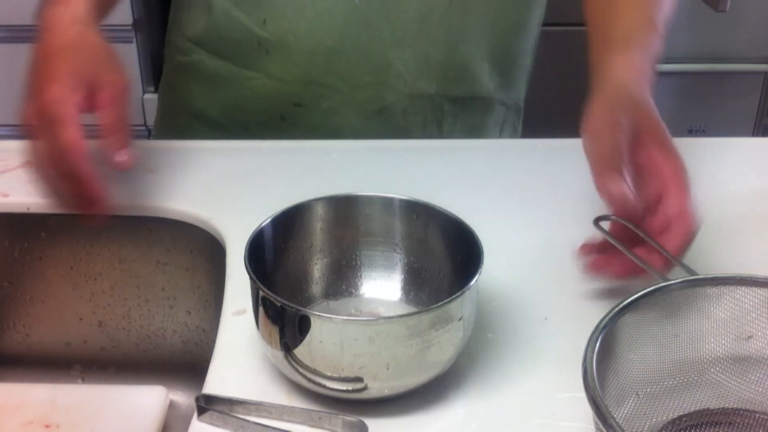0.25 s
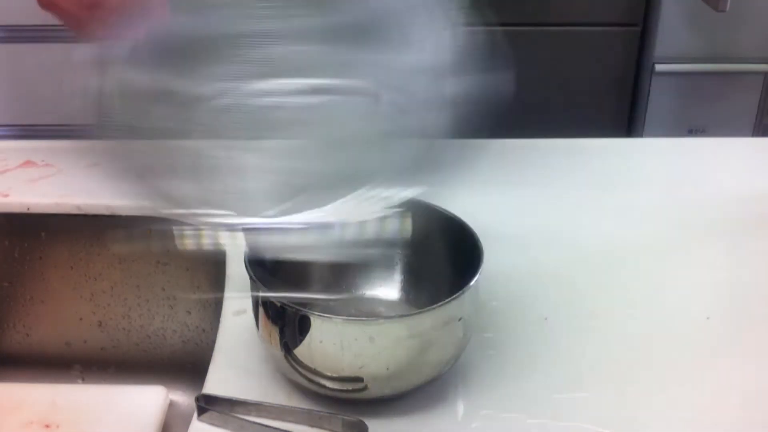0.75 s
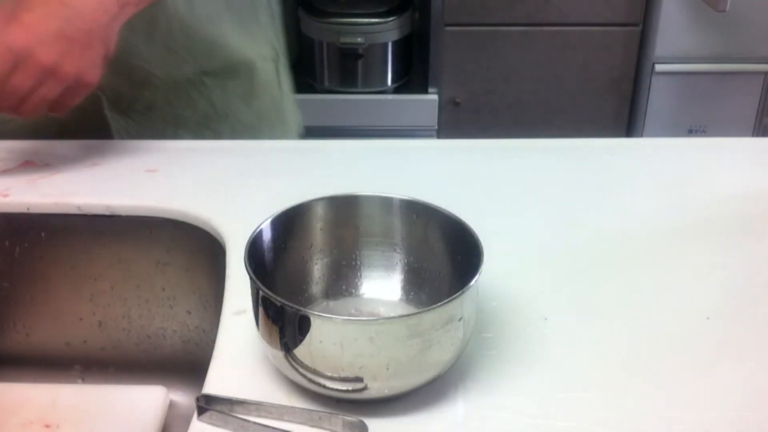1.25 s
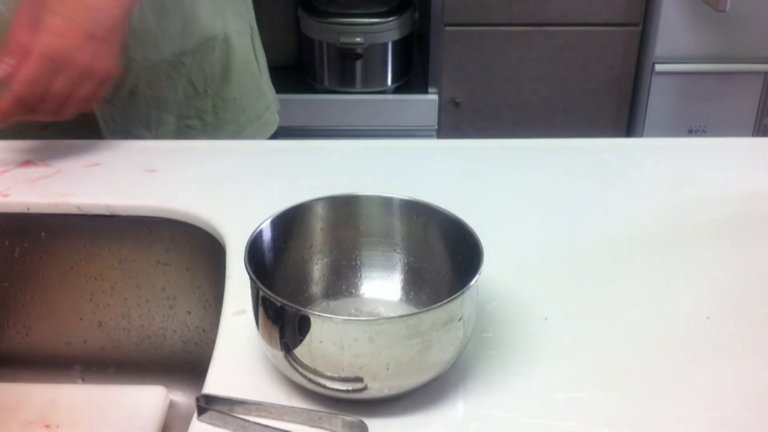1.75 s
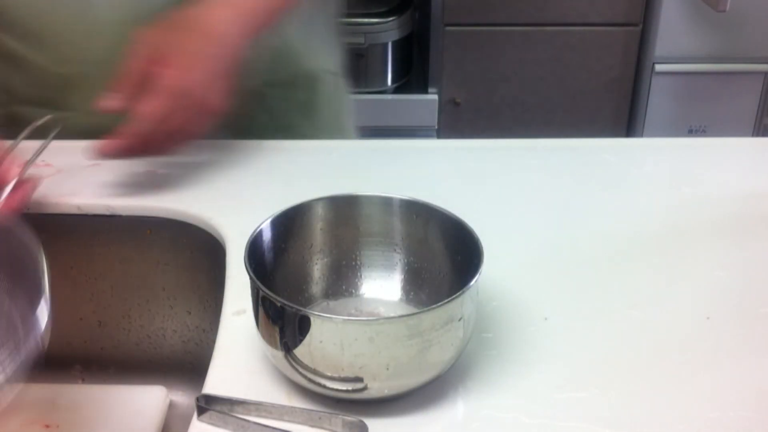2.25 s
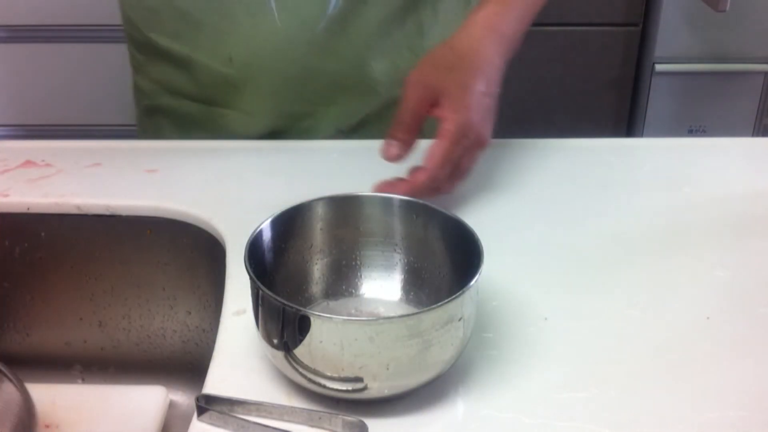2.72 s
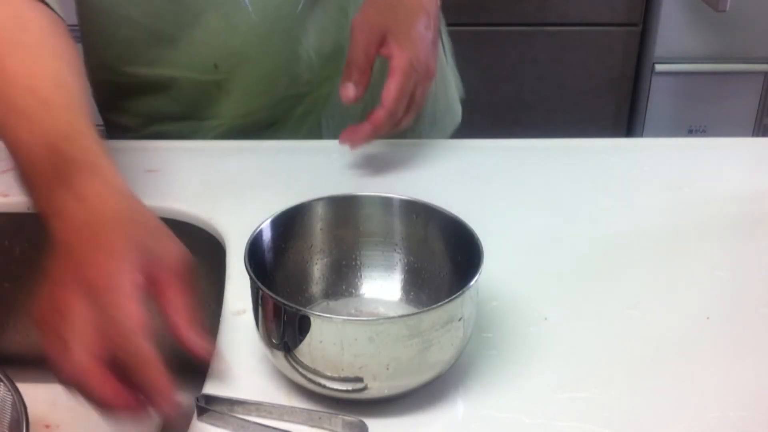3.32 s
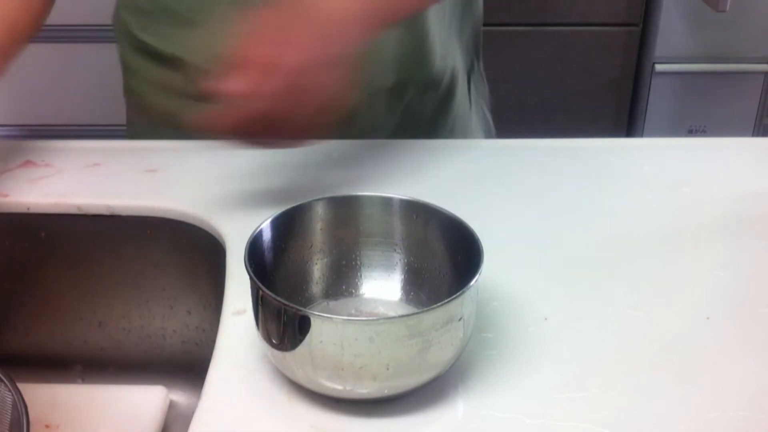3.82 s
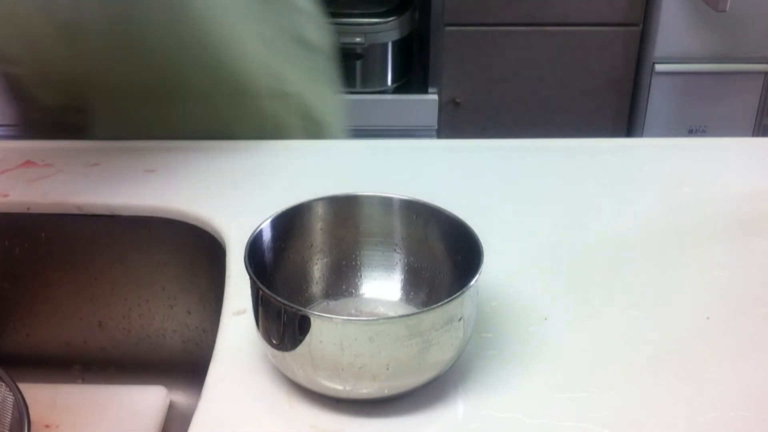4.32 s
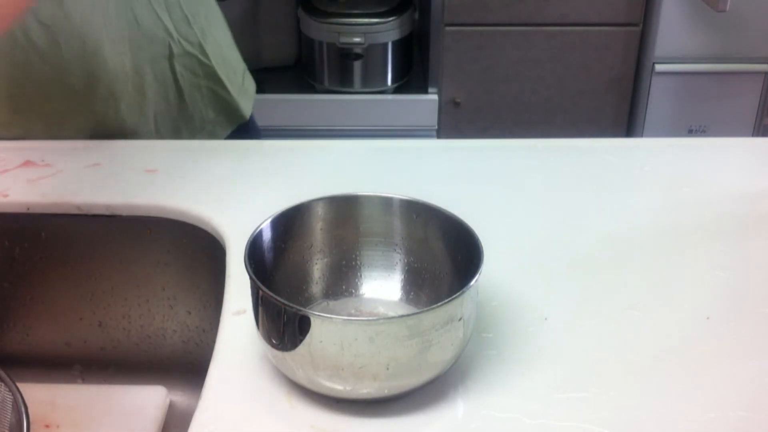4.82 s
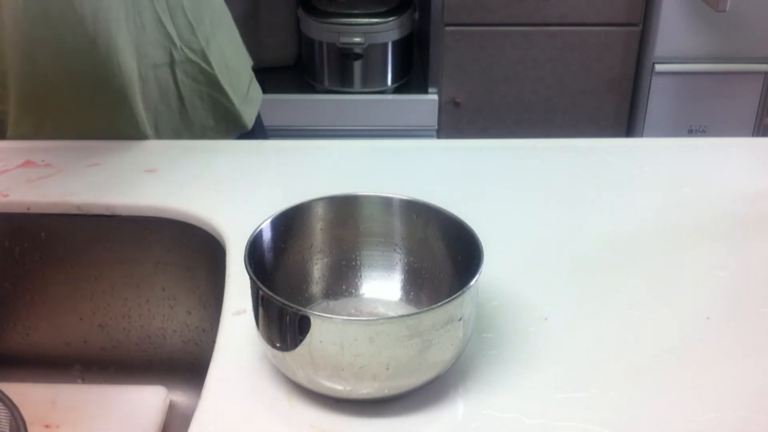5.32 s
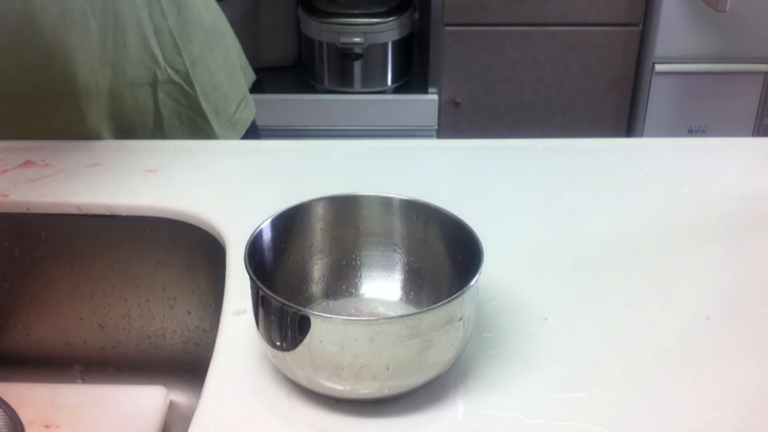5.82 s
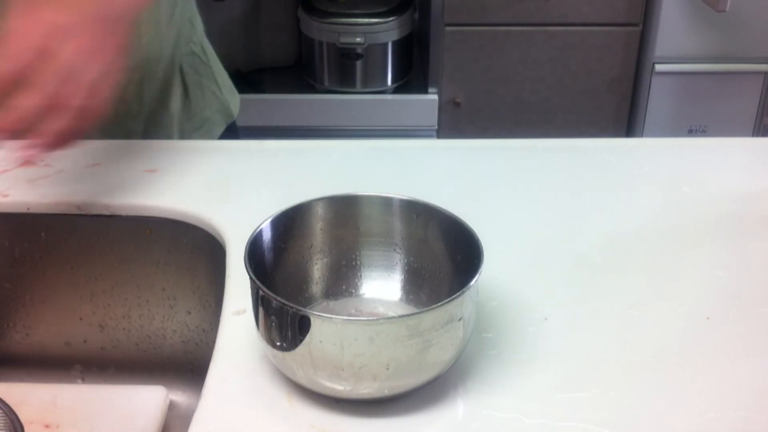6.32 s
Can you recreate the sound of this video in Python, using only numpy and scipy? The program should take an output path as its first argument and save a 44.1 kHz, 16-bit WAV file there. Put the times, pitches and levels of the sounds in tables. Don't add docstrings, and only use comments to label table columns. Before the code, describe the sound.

Near silence with low mains hum and barely audible ticks comes first. Then bright steel rim knocks and mesh rattle burst out as a strainer rocks in the basin, followed by a light double clink of tongs. After a pause, metal utensils bang hollowly in the sink amid spitting, stop-start tap spray and drips. A counter microphone hears it close, with short hard kitchen echoes.

```python
import sys
import numpy as np
from scipy import signal
from scipy.fft import rfft, irfft, next_fast_len
from scipy.io import wavfile
from scipy.ndimage import uniform_filter1d, map_coordinates

SR = 44100
rng = np.random.default_rng(int(sys.argv[2]) if len(sys.argv) > 2 else 0)


def voltage_ratio(decibels):
    exponent = np.asarray(decibels, float) / 20
    return 10 ** exponent


def wav_out(sig):
    wavfile.write(sys.argv[1], SR, np.round(np.clip(np.atleast_2d(sig).T, -1, 1) * 32767).astype(np.int16))


N = 289296
OPEN_S = 4.5

# frequency in Hz, width in Hz, level in dB.
BASIN_MODES = [(108, 15.3, -4.5), (155.2, 13.3, 0.5), (238.7, 26, -5.5), (290, 11.4, 0), (330, 34.5, -3),
               (408.2, 14, -0.5), (466, 10.6, -2.5), (560, 22, -5.5), (655, 105, -9), (702, 27.5, -5),
               (730, 69, -26), (958, 39, -12), (1138, 71, -19.5)]
# frequency in Hz, width in Hz, level in dB.
UTENSIL_MODES = [(930, 90, -3), (1150, 90, -5), (1480, 120, -3), (1850, 160, -1), (2450, 140, -1),
                 (2950, 160, -4), (3400, 150, -4), (3900, 170, -4), (4500, 150, -2), (4950, 200, -1),
                 (5550, 200, 0), (6000, 200, -2), (6600, 220, -5), (7300, 220, -4), (8400, 250, -4),
                 (9200, 250, -6), (10200, 280, -6), (11500, 300, -7)]


def unit(x):
    return x / np.sqrt(np.mean(x ** 2) + 1e-20)


def peak(x):
    return x / np.abs(x).max()


def along(points, hz):
    f, v = np.transpose(points)
    return np.interp(np.log(hz + 1), np.log(f + 1), v)


def wobble(rate):
    knots = rng.standard_normal(int(N * rate / SR) + 4)
    return map_coordinates(knots, [np.arange(N) * rate / SR])


def filtered(x, response):
    m = next_fast_len(len(x) + SR // 4)
    return irfft(rfft(x, m) * response(np.fft.rfftfreq(m, 1 / SR)), m)[:len(x)]


def resonant(modes, widen=1):
    def response(f):
        total = 0
        for k, (centre, width, db) in enumerate(modes):
            damping = 1j * f * width * widen
            total = total + (-1) ** k * voltage_ratio(db) * damping / (centre * centre - f * f + damping)
        return total
    return response


def above(hz):
    return lambda f: (1j * f / (1j * f + hz)) ** 4


def patchy(depth_db):
    z = signal.stft(rng.standard_normal(N), nperseg=512)[2]
    field = uniform_filter1d(rng.standard_normal(z.shape), 8, 0)
    field = uniform_filter1d(field, 6, 1)
    return signal.istft(z * voltage_ratio(depth_db * unit(field)), nperseg=512)[1][:N]


def fade(t, t60, rise):
    return voltage_ratio(-60 * t / np.maximum(t60, .005)) * (1 - np.exp(-t / np.maximum(rise, 1e-4)))


def unsteady(hz, t, blur):
    return np.sin(2 * np.pi * hz * t + blur * np.cumsum(rng.standard_normal(len(t))))


def add(track, s, sound):
    part = track[round(s * SR):][:len(sound)]
    part += sound[:len(part)]


def spells(rows, rise, fall):
    t = np.arange(N) / SR
    power = 0
    for a, b, first, last in rows:
        held_db = np.interp(t, [a, b + 1e-6], [first, last])
        level_db = held_db - rise * np.maximum(a - t, 0) - fall * np.maximum(t - b, 0)
        power = power + voltage_ratio(2 * level_db)
    return 10 * np.log10(power + 1e-24)


def swells(rows):
    rub_db = spells([(s, s, db, db) for s, db, _ in rows], rise=188, fall=210)
    boom_db = spells([(s, s, db, db) for s, _, db in rows], rise=188, fall=103)
    return rub_db, boom_db


def hush():
    # frequency in Hz, density in dB per Hz.
    air_colour = [(12, -38), (20, -9), (30, -14), (50, -38), (80, -13), (105, -9), (125, -8), (150, -5),
                  (300, -5), (400, -6), (700, -12), (2580, -14.5), (7700, -18), (15200, -22.5),
                  (16500, -26)]
    # frequency in Hz, level in dB rms.
    hum_tones = [(120, -64.5), (240, -80.5), (300, -81.5)]
    # moment in seconds, level in dB.
    stirs = [
        (.5, -68),
        (4.52, -57.5),
    ]
    t = np.arange(N) / SR
    stir_db = spells([(s, s, db, db) for s, db in stirs], rise=27, fall=27)
    level = np.hypot(voltage_ratio(-60.5), voltage_ratio(stir_db))
    out = level * unit(filtered(patchy(depth_db=1.0), lambda f: voltage_ratio(along(air_colour, f))))
    for hz, db in hum_tones:
        strength = np.sqrt(2) * voltage_ratio(db - 1 + 2.5 * wobble(13))
        out += strength * np.sin(2 * np.pi * hz * t + .4 * wobble(6))
    return out


def drips():
    # start in seconds, peak level in dB, pitch in Hz.
    drip_events = [(0.1336, -50, 2200), (0.4489, -49, 2320), (0.548, -52, 1710), (0.555, -54, 3300),
                   (0.48, -55, 3000), (1.2143, -47, 2570), (1.4611, -56, 2140), (1.6457, -50.5, 2710),
                   (2.5087, -56, 2270), (5.373, -33, 2350), (5.905, -26, 3020), (5.919, -23.5, 2300),
                   (6.1883, -40.5, 2130), (6.2618, -43, 2810), (6.273, -37.5, 933), (6.289, -38, 1770),
                   (6.332, -44, 2250), (6.3746, -39.5, 2280), (6.401, -34, 2276), (6.404, -34.5, 1322)]
    out, t = np.zeros(N), np.arange(SR // 5) / SR
    for s, db, hz in drip_events:
        tone = unsteady(hz * (1 + .4 * t), t, .08)
        edge = unit(filtered(rng.standard_normal(len(t)), resonant([(1.1 * hz, .25 * hz, 0)])))
        add(out, s, voltage_ratio(db - 4.5) * (tone + 0.45 * edge) * fade(t, t60=0.088, rise=0.0012))
    return out


def thuds():
    # start in seconds, peak level in dB, pitch in Hz.
    floor_blows = [(0.474, -47, 120), (2.593, -25, 213), (2.609, -21, 590), (2.691, -25.5, 79),
                   (2.695, -27.5, 223), (2.767, -20, 156), (2.781, -20.5, 323), (2.809, -21.5, 700),
                   (2.909, -22.5, 300), (2.99, -25.5, 99), (4.648, -18.5, 200), (3.149, -31, 375),
                   (3.576, -36.5, 190), (3.577, -39, 400), (4.524, -42, 136), (4.566, -20, 397),
                   (4.576, -23, 148), (4.586, -19.5, 368), (4.632, -15, 185), (4.795, -29.5, 316),
                   (5.149, -29.5, 553), (5.422, -13, 337), (5.442, -27, 80), (5.448, -20.5, 325),
                   (5.529, -29, 346), (5.778, -25, 400), (5.825, -15, 450), (5.6, -28, 560),
                   (5.68, -28, 540), (6.458, -38, 420), (6.498, -29, 520), (5.831, -16, 110),
                   (5.849, -16.5, 360), (6.003, -33, 320), (6.074, -23, 145), (6.504, -26, 445)]
    out, t = np.zeros(N), np.arange(SR // 2) / SR
    basin = resonant(BASIN_MODES, widen=0.47)
    for s, db, hz in floor_blows:
        t60_at_300_hz = .17 if s > OPEN_S else .2
        t60 = t60_at_300_hz * (hz / 300) ** 0.54
        near = resonant([(hz, 1.24 * hz, 0)])
        push = rng.standard_normal(len(t)) * fade(t, t60, rise=0.00033)
        boom = filtered(push, lambda f: near(f) ** 3 * (0.5 + basin(f)))
        add(out, s, voltage_ratio(db - 2.5) * peak(boom))
    return out


def spits():
    # start in seconds, peak level in dB, pitch in Hz.
    bursting_drops = [(4.7694, -29, 4840), (4.7894, -29, 4630), (4.8144, -30, 9070), (4.8444, -31, 6150),
                      (4.8814, -31, 3720), (4.9162, -26, 10600), (4.9444, -30, 8640), (4.9744, -30, 4930),
                      (5.0918, -23, 5890), (5.1144, -21, 4350), (5.2044, -21, 4220), (5.2544, -21, 4580),
                      (5.2694, -21, 5030), (5.3564, -25, 5360), (5.5474, -24, 5930), (5.6894, -25, 5410),
                      (5.7394, -25, 3000), (6.2901, -39, 3120), (6.3914, -40, 3830)]
    # start in seconds, peak level in dB, pitch in Hz.
    finger_ticks = [
        (.49, -47, 2600),
        (.552, -46, 2800),
        (1.218, -46, 3300),
    ]
    out, t = np.zeros(N), np.arange(SR // 20) / SR
    for s, db, hz in bursting_drops + finger_ticks:
        band = resonant([(hz, .5 * hz, 0)])
        noise = rng.standard_normal(len(t)) * fade(t, t60=.02, rise=.0003)
        puff = filtered(noise, lambda f: band(f) ** 2)
        add(out, s, voltage_ratio(db - 6) * peak(puff))
    return out


def rings():
    # start in seconds, peak level in dB, frequency in Hz, t60 in seconds.
    long_rings = [(2.597, -27, 3350, 0.12), (2.597, -24, 5600, .08), (2.884, -27, 2450, .1),
                  (2.884, -27, 1430, .06), (3.614, -46, 8350, .12), (3.618, -41, 5500, .06),
                  (5.83, -19, 5900, .04), (6.525, -38, 7200, .05), (2.4, -60, 2510, 0.22),
                  (3.007, -48, 4480, 0.45), (2.68, -19.5, 1850, 0.074), (2.805, -24, 1700, 0.063),
                  (2.964, -30.5, 1700, 0.061), (3.118, -34, 690, 0.13), (3.576, -48, 360, .1),
                  (5.423, -27, 760, .1), (4.65, -33, 700, 0.11), (5.41, -29, 3100, .15),
                  (5.37, -38.5, 960, 0.18), (6.036, -27, 2400, 0.051), (5.828, -18, 5100, 0.07),
                  (3.2, -51, 338, 1.5), (3.12, -50, 410, 0.8), (4.579, -33.5, 1620, 0.099),
                  (4.632, -32, 1700, 0.06), (4.64, -25, 151, 0.45), (4.58, -31, 151, .3),
                  (5.41, -25, 4450, .07), (5.423, -24, 2450, .07), (3.646, -39, 1690, .06),
                  (3.64, -40, 1070, .1), (4.64, -25, 275, 0.22), (5.423, -23, 920, 0.12),
                  (5.53, -28, 930, 0.1), (5.824, -13.5, 1660, 0.048), (5.831, -23, 2700, .15),
                  (5.83, -13, 4950, 0.083), (5.84, -14, 310, 0.088), (6.499, -30.5, 1330, 0.2)]
    out, t = np.zeros(N), np.arange(SR) / SR
    for s, db, hz, t60 in long_rings:
        blur = .0004 * hz ** .68
        add(out, s, voltage_ratio(db) * fade(t, t60, rise=.002) * unsteady(hz, t, blur))
    return out


def rattle(rows, t60, width):
    out, t = np.zeros(N), np.arange(SR // 4) / SR
    shine = resonant([(8000, 8200, 0)])
    for s, db, hz, treble_db in rows:
        near = resonant([(hz, width * hz, 0)])
        struck = [(c * (1 + rng.normal(0, .045)), w, g + rng.normal(0, 2.5)) for c, w, g in UTENSIL_MODES]
        ware = resonant(struck, widen=1.3)
        contact = fade(t, t60, 0.0003) + 1.57 * fade(t, 0.033, 0)
        body = filtered(contact * rng.standard_normal(len(t)), lambda f: near(f) ** 4 * (.7 + ware(f)))
        bright = filtered(contact * rng.standard_normal(len(t)), lambda f: shine(f) ** 2 * (.7 + ware(f)))
        add(out, s, voltage_ratio(db - 2.5) * (peak(body) + voltage_ratio(treble_db) * peak(bright)))
    return out


def strainer_knocks():
    # start in seconds, peak level in dB, main resonance in Hz, treble in dB.
    rim_knocks = [
        (2.594, -9.5, 6000, -13),
        (2.68, -9, 1740, -54),
        (2.752, -28, 1500, -29),
        (2.758, -17, 1900, -28),
        (2.805, -11.5, 1760, -50),
        (2.882, -17, 3000, -13),
        (2.885, -11, 2130, -18),
        (2.965, -20, 2400, -50),
        (3.118, -26, 900, -36),
    ]
    # start in seconds, peak level in dB, main resonance in Hz, treble in dB.
    mesh_chatter = [
        (2.596, -17, 1500, -33),
        (2.6, -14, 2900, -30),
        (2.594, -17, 4200, -10),
        (2.598, -11, 5530, -6),
        (2.7543, -24.5, 3030, -32),
        (2.87, -24, 1738, -33),
        (3.0065, -27.5, 3720, -6),
        (3.024, -25, 3000, -9),
        (3.0435, -32.5, 3080, -6),
    ]
    return rattle(rim_knocks, t60=0.072, width=1.54) + rattle(mesh_chatter, t60=0.15, width=1.42)


def jolts():
    # start in seconds, peak level in dB.
    counter_jolts = [
        (2.6, -52),
        (2.72, -55),
        (3.62, -59),
        (4.92, -58),
        (5.42, -54),
        (5.83, -42),
        (6.52, -54),
    ]
    out, t = np.zeros(N), np.arange(SR // 4) / SR
    for s, db in counter_jolts:
        add(out, s, voltage_ratio(db) * fade(t, t60=0.13, rise=.006) * np.sin(2 * np.pi * 38 * t))
    return out


def drumming(level_db):
    shake = rng.standard_normal(N) * voltage_ratio(2.3 * wobble(30))
    return voltage_ratio(level_db) * unit(filtered(shake, resonant(BASIN_MODES, widen=1.55)))


def scraping(level_db):
    # frequency in Hz, density in dB per Hz.
    splash_colour = [(500, -78), (900, 16), (1500, 19), (3000, 14.5), (5000, -25)]
    ware = resonant(UTENSIL_MODES, widen=6.9)
    rough = filtered(patchy(depth_db=3), lambda f: voltage_ratio(along(splash_colour, f)) * (1.5 + ware(f)))
    return voltage_ratio(level_db) * unit(rough)


def strainer():
    # moment in seconds, scrape level in dB, drumming level in dB.
    rubs = [
        (2.66, -46, -54),
        (2.764, -42, -28),
        (2.922, -58, -30.5),
        (3.05, -33, -34),
        (3.16, -57, -47),
        (3.65, -43.5, -56),
    ]
    scrape_db, drum_db = swells(rubs)
    return drumming(drum_db) + scraping(scrape_db - 6)


def tongs():
    # start in seconds, peak level in dB.
    tong_taps = [
        (3.612, -38),
        (3.618, -31),
        (3.637, -18.5),
        (3.646, -18),
        (3.656, -26),
    ]
    # frequency in Hz, level in dB, t60 in seconds.
    tong_modes = [(1066, -11, .1), (1459, -11, .08), (1685, -8, .08), (2552, -13, .07), (3300, -13, .07),
                  (4468, -14, .07), (5500, -6, .05), (6982, -4, .07), (8300, -11, .07), (8570, -15, .08),
                  (10130, -11, .12), (10940, -18, .1), (11580, -7, .11), (14010, -9, .065),
                  (14950, -15, .06)]
    out, t = np.zeros(N), np.arange(SR // 3) / SR
    for s, db in tong_taps:
        ring = 0
        for hz, level, t60 in tong_modes:
            strength = voltage_ratio(level + rng.normal(0, 3))
            ring = ring + strength * fade(t, .8 * t60, .0005) * unsteady(hz, t, .06)
        scuff = unit(filtered(rng.standard_normal(len(t)), resonant([(2500, 5300, 0)])))
        add(out, s, voltage_ratio(db - 11) * (ring + .42 * fade(t, .075, 0) * scuff))
    return out


def utensil_knocks():
    # start in seconds, peak level in dB, main resonance in Hz, treble in dB.
    clean_taps = [(4.583, -24.5, 1550, -10), (4.629, -21, 1480, -15), (5.168, -19.5, 3300, -33),
                  (5.348, -31, 5000, 1), (5.423, -13, 1000, -10), (5.45, -18, 3600, -4.5),
                  (5.529, -26, 930, -14), (5.5983, -24, 8000, -14), (5.824, -12.5, 1640, -25),
                  (5.83, -8, 5150, -23), (5.832, -9, 5270, -0.5), (5.992, -12, 2600, -34),
                  (5.991, -19, 4000, -45), (6.037, -15, 2180, -25), (6.086, -32, 3300, -0.5),
                  (6.375, -36, 9070, -12), (6.456, -36, 4430, -5), (6.459, -33, 1500, -12)]
    # start in seconds, peak level in dB, main resonance in Hz, treble in dB.
    clashes = [(4.569, -14, 4600, -8), (4.89, -50, 3700, -20), (5.408, -13, 4150, -9),
               (5.41, -11.5, 2260, -30), (5.644, -22.5, 3360, -29), (5.833, -16.5, 2280, -30),
               (5.993, -14, 1400, -30), (6.494, -30, 2000, -2), (6.497, -21.5, 1330, -2),
               (6.51, -24, 1400, -6), (6.5028, -23, 3360, -7), (6.5294, -28, 2610, 2)]
    return rattle(clean_taps, t60=0.064, width=1.1) + rattle(clashes, t60=0.2, width=1.62)


def droplets(count, centre_hz, spread, cycles, scatter_db):
    u, t = rng.random((count, 2)), np.arange(256) / SR
    hz = np.clip(centre_hz * np.exp(spread * rng.standard_normal((count, 1))), 300, 15000)
    size = voltage_ratio(-scatter_db * np.log(u[:, 1:]))
    grain = size * np.exp(-t * hz / cycles) * np.sin(2 * np.pi * hz * t)
    start = OPEN_S + u[:, :1] * (N / SR - OPEN_S)
    at = (start * SR).astype(int) + np.arange(256)
    return np.bincount(at.ravel(), grain.ravel(), N + 256)[:N] * np.sqrt(N / (N - OPEN_S * SR))


def tap():
    # open in seconds, shut in seconds, flow in dB at opening, flow in dB at shutting.
    bursts = [(4.735, 4.87, -48, -45.5), (4.9, 5.07, -44, -47.5), (5.098, 5.19, -37, -35),
              (5.21, 5.28, -38.5, -39), (5.3, 5.34, -47, -47), (5.36, 5.6, -39.5, -35.5),
              (5.64, 5.94, -36, -38), (6.0, 6.11, -49.5, -49.5), (6.16, 6.24, -55.5, -54.5),
              (6.28, 6.4, -52.5, -54), (6.44, 6.47, -56, -51), (6.515, 6.6, -41.5, -46)]
    # moment in seconds, splash level in dB, drumming
    # level in dB.
    handling = [(4.65, -63, -32.5), (4.8, -74, -50), (5.0, -66, -36.5), (5.13, -60, -41), (5.24, -47, -41),
                (5.47, -30, -29.5), (5.7, -46, -45), (5.87, -40, -33), (6.045, -35.5, -29), (6.1, -47, -33),
                (6.25, -47.5, -45), (6.34, -53, -53), (6.56, -46, -34.5)]
    # frequency in Hz, density in dB per Hz.
    spray_colour = [(880, -50), (1500, 4), (1900, -30), (2720, -6), (3090, 1.5), (3480, -0.5), (4550, 4.5),
                    (4830, 4), (14500, -3.5), (16000, -7)]
    spray_db = spells(bursts, rise=480, fall=292)
    handled_db, boom_db = swells(handling)
    splash = voltage_ratio(spray_db - 18.5) + voltage_ratio(handled_db)
    drum = voltage_ratio(spray_db - 4.5) + voltage_ratio(boom_db)
    flutter = 1.3 * wobble(25) + .9 * wobble(70)
    mist = unit(filtered(patchy(depth_db=2.1), lambda f: voltage_ratio(along(spray_colour, f))))
    fizz = unit(droplets(count=9000, centre_hz=6000, spread=.45, cycles=2, scatter_db=2.4))
    bubbles = unit(droplets(count=600, centre_hz=2300, spread=.3, cycles=9, scatter_db=1.1))
    spray = voltage_ratio(spray_db + flutter) * (mist + .38 * fizz)
    return spray + splash * (scraping(flutter - 4) + voltage_ratio(-17.0) * bubbles) + drum * drumming(-3.34)


def caught():
    # start in seconds, end in seconds, level in dB, centre in Hz.
    catches = [
        (4.76, 4.86, -50, 7500),
        (4.89, 4.975, -51, 3800),
        (5.1, 5.135, -44, 4000),
        (5.15, 5.19, -38, 3700),
        (5.25, 5.285, -46, 3800),
        (5.75, 5.81, -44, 4300),
        (6.497, 6.54, -40, 3200),
        (6.497, 6.53, -42, 7500),
    ]
    out = np.zeros(N)
    for a, b, db, hz in catches:
        band = resonant([(hz, .7 * hz, 0)])
        level_db = spells([(a, b, db, db)], rise=2500, fall=500) + 2.5 * wobble(90)
        out += voltage_ratio(level_db) * unit(filtered(rng.standard_normal(N), lambda f: band(f) ** 2))
    return out


def room(x):
    # frequency in Hz, t60 in seconds.
    room_t60 = [(100, 0.44), (1000, 0.31), (5000, 0.25), (15000, 0.16)]
    out, step = np.zeros(N), SR // 4
    for start in range(0, N, step):
        hz, t, z = signal.stft(rng.standard_normal(SR // 2), SR, nperseg=256)
        decay = voltage_ratio(-60 * t / along(room_t60, hz)[:, None])
        tail = signal.istft(z * decay, SR, nperseg=256)[1]
        echo = signal.fftconvolve(x[start:start + step], tail / np.linalg.norm(tail))
        add(out, start / SR + 0.0066, echo)
    return out


def scene():
    blows = strainer_knocks() + utensil_knocks() + thuds() + rings() + tongs() + drips()
    water = tap() + spits() + caught()
    sink = blows + water + strainer() + voltage_ratio(-10) * room(blows + voltage_ratio(-4) * water)
    return (filtered(sink, above(hz=68)) + jolts() + hush())[None]


def duck_treble(heard):
    # start in seconds, length in seconds, lower edge in Hz, share removed.
    ducks = [
        (2.575, 0.013, 500, .97),
        (2.993, 0.0091, 5300, .93),
        (3.619, 0.012, 8470, .9),
        (4.549, 0.011, 3900, .95),
        (2.74, .012, 7000, .7),
        (2.772, .01, 6500, .65),
        (2.874, .006, 5000, .7),
        (6.478, .015, 3800, .55),
        (2.9, .09, 7500, .35),
    ]
    t = np.arange(N) / SR
    for s, length, edge_hz, share in ducks:
        gap = uniform_filter1d(1. * ((t > s) & (t < s + length)), size=60)
        heard = heard - share * gap * filtered(heard, lambda hz: hz > edge_hz)
    return heard


def band_limit(x):
    return signal.sosfilt(signal.butter(12, 16500, fs=SR, output="sos"), x)


def record(dry):
    heard = filtered(dry[0], lambda hz: (hz < 15900) + voltage_ratio(-46) * (hz < 16450))
    heard = duck_treble(heard)
    return band_limit(heard[None])


dry = scene()
out = record(dry)
wav_out(out)
```